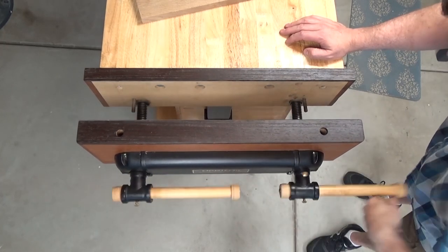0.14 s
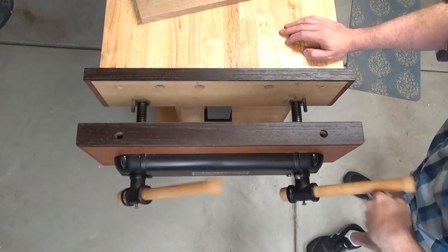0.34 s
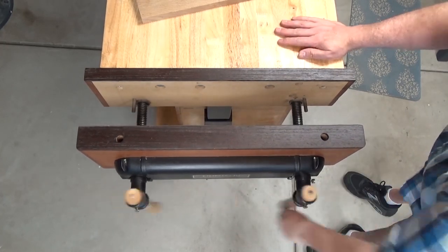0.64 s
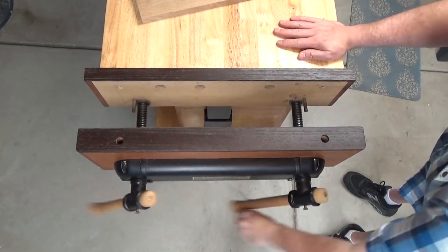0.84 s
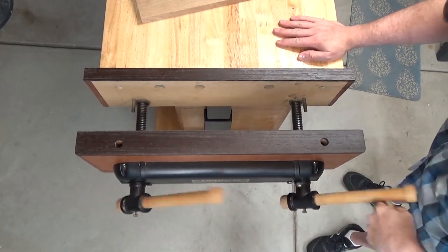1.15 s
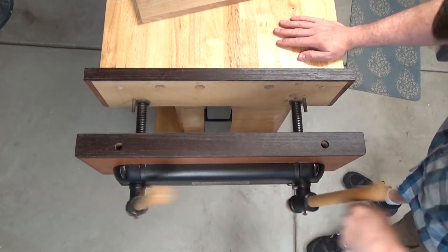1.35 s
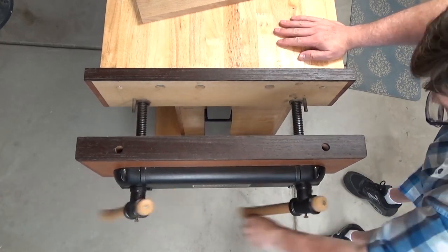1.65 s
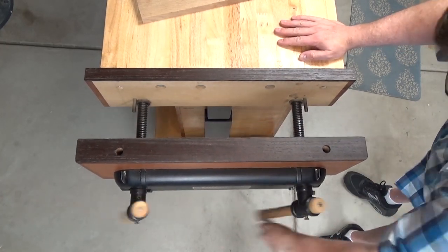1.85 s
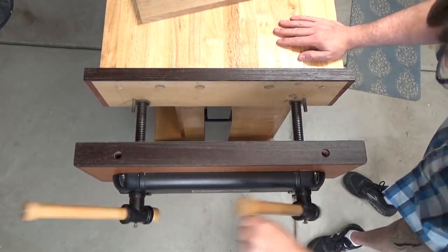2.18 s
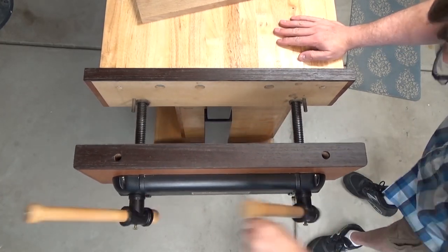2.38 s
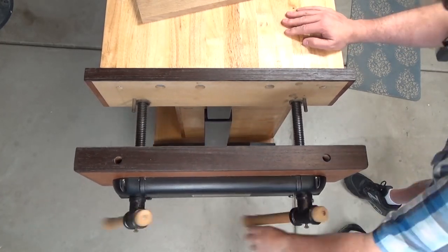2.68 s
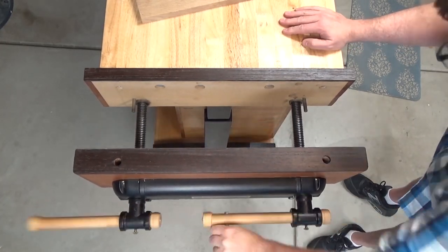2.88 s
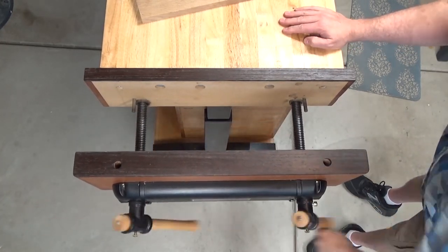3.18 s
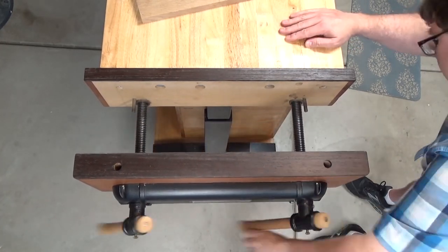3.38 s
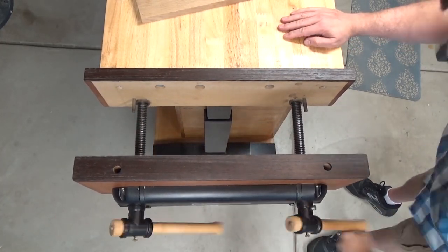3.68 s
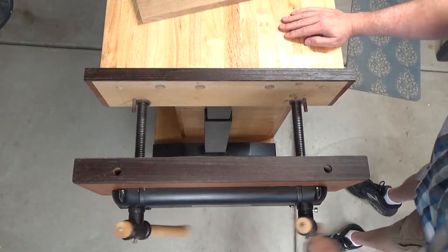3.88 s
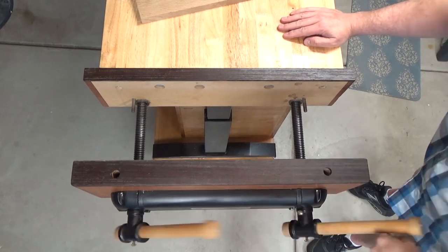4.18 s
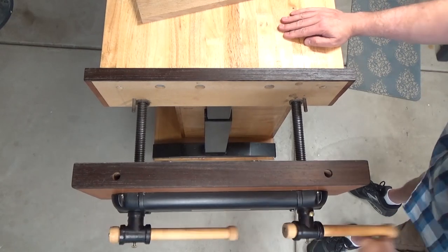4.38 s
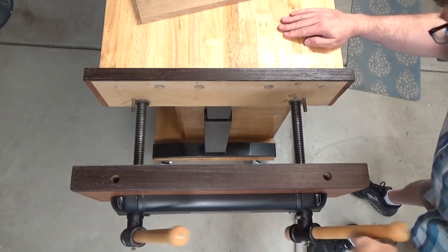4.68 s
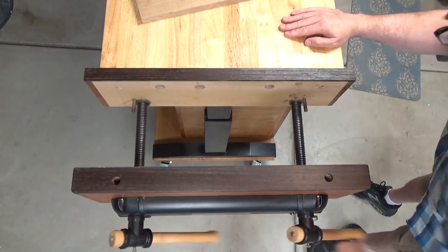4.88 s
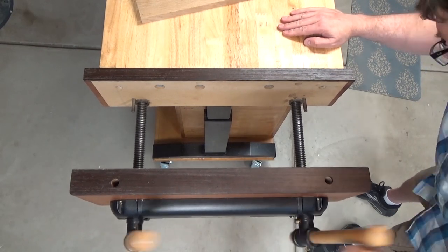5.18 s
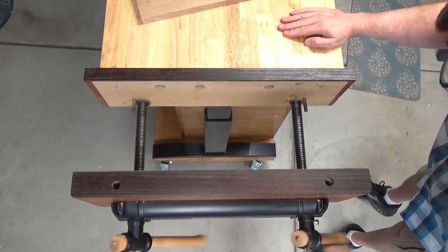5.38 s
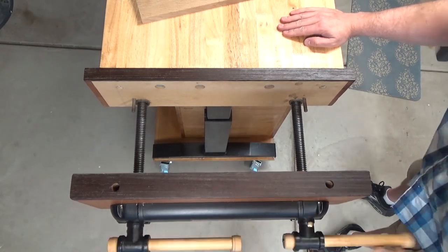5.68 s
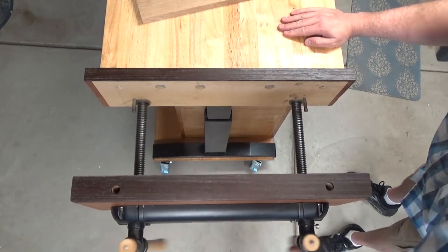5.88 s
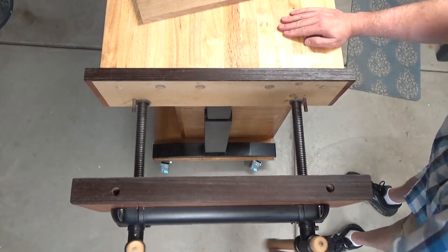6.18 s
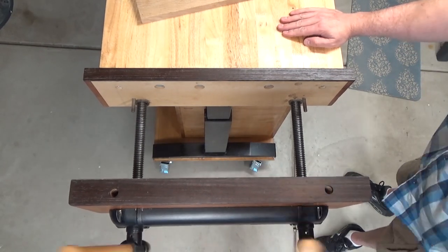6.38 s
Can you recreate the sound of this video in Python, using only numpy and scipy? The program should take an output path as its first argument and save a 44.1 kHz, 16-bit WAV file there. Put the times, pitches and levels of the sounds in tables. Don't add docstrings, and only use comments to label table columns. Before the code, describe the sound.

A heavy bench vise is cranked open in a small workshop. Rough screw threads grind continuously while a chain hisses brightly and ticks over its sprockets. Loose wooden handles knock in iron sockets at irregular intervals, with a hard clack around 2.6 seconds and denser clatter near the end. Close stereo microphones, little bass, short room tail.

```python
import sys
import numpy as np
from scipy import signal
from scipy.fft import rfft, irfft, next_fast_len
from scipy.io import wavfile
from scipy.ndimage import uniform_filter1d, minimum_filter1d

SR = 44100
rng = np.random.default_rng(int(sys.argv[2]) if len(sys.argv) > 2 else 0)


def makeup_ratio(level_db):
    decades = np.asarray(level_db, float) / 20
    return 10 ** decades


def log_audio(samples):
    frames = np.atleast_2d(samples).T
    limited = np.clip(frames, -1, 1)
    pcm = np.round(limited * 32767).astype(np.int16)
    wavfile.write(sys.argv[1], SR, pcm)


N = 288414


def rms_one(x):
    return x / np.sqrt(np.mean(x ** 2) + 1e-20)


def at_hz(points, hz):
    table_hz, values = np.transpose(points)
    return np.interp(np.log(hz), np.log(table_hz), values)


def colour(x, points):
    size = next_fast_len(x.shape[-1])
    hz = np.arange(size // 2 + 1) * SR / size + 1
    inside = (hz > points[0][0]) & (hz < points[-1][0])
    spectrum = rfft(x, size) * makeup_ratio(at_hz(points, hz)) * inside
    return irfft(spectrum, size)[..., :x.shape[-1]]


def filtered(x, order, hz, kind):
    return signal.sosfilt(signal.butter(order, hz, kind, fs=SR, output="sos"), x)


def drift(rate_hz):
    knots_per_s = 200
    knots = rng.standard_normal(int(N / SR * knots_per_s) + 400)
    r = np.exp(-2 * np.pi * rate_hz / knots_per_s)
    slow = signal.lfilter([1], [1, -2 * r, r * r], knots)
    slow = rms_one(slow[300:])
    return np.interp(np.arange(N) * knots_per_s / SR, np.arange(len(slow)), slow)


def ring(clicks, hz, t60):
    r = makeup_ratio(-60 / (t60 * SR))
    w = 2 * np.pi * hz / SR
    return signal.lfilter([0, np.sin(w)], [1, -2 * r * np.cos(w), r * r], clicks + 1e-18)


def dying(clicks, t60):
    return signal.lfilter([1], [1, -makeup_ratio(-60 / (t60 * SR))], clicks + 1e-18)


def grains(per_s, spread_db):
    sizes = makeup_ratio(spread_db * np.minimum(rng.exponential(1, N), 5))
    sizes = sizes * rng.choice([-1, 1], N)
    return rms_one(sizes * (rng.random(N) < per_s / SR))


def strike(times, gains, late_s):
    clicks = np.zeros(N)
    places = ((times + late_s) * SR).astype(int)
    np.add.at(clicks, np.minimum(places, N - 1), gains)
    return clicks


def low_noise(hits):
    floor = makeup_ratio(-88) * rms_one(colour(rng.standard_normal((2, N)), [(10, 0), (170, -2)]))
    return floor * (1 + makeup_ratio(33) * uniform_filter1d(np.abs(hits), size=1500))


# frequency in Hz, t60 in seconds.
SHOP_DECAY = [(300, 0.24), (1000, 0.22), (2500, 0.14), (6000, 0.13), (14000, 0.066)]
# frequency in Hz, side minus mid in dB, before a common lift of
# 8.5 dB.
ECHO_WIDTH = [(200, -31), (600, -30.5), (1000, -39), (1500, -35.5), (2400, -15), (4800, -10), (8500, -6.5),
              (13000, -15.5)]


def shop_echoes(x):
    first_s, paths = 0.0016, 7
    t = np.arange(int(.4 * SR)) / SR
    white = rng.standard_normal((paths, 2, len(t)))
    echo = 0
    for low in 125 * 2.0 ** np.arange(7):
        t60 = at_hz(SHOP_DECAY, low * np.sqrt(2))
        echo = echo + filtered(white, 2, [low, 2 * low], "band") * makeup_ratio(-60 * t / t60)
    echo = echo * np.clip(t / first_s - 1, 0, 1)
    echo = echo / np.sqrt(np.sum(echo[0, 0] ** 2))
    path = np.arange(N) // 1500 % paths
    size = next_fast_len(N + len(t))
    spectrum = sum(rfft(x * (path == k), size) * rfft(echo[k], size) for k in range(paths))
    mid, side = filtered(irfft(spectrum, size)[:, :N], 4, 400, "high")
    return mid, makeup_ratio(8.5) * colour(side, ECHO_WIDTH + [(17000, -19)])


# start in seconds, level in dB.
JAW_JOLTS = [(0.17, -62), (0.73, -61), (0.98, -65), (1.36, -61), (1.85, -67), (2.17, -63), (2.37, -64),
             (2.55, -52.5), (3.49, -60), (3.94, -63), (4.2, -60), (4.46, -58), (4.95, -53), (5.19, -53),
             (5.76, -60), (6.0, -54)]
# frequency in Hz, density in dB per Hz.
RUMBLE_SPECTRUM = [(82, -66), (140, -58), (215, 0), (301, -11.5), (353, -1), (415, -13), (672, -5),
                   (722, -35), (800, 7), (1040, -69), (1760, -120)]


def jaw_rumble(push_db):
    s, db = np.transpose(JAW_JOLTS)
    swell = np.hanning(int(2 * 0.025 * SR))
    decay = dying(strike(s, makeup_ratio(db), 0), 0.26)
    jolts = signal.fftconvolve(decay, 2 * swell / swell.sum())[:N]
    idle = makeup_ratio(push_db - 32.5)
    shake = rms_one(colour(rng.standard_normal(N), RUMBLE_SPECTRUM))
    return (jolts + idle) * makeup_ratio(2.0 * drift(23)) * shake


# start in seconds, length in seconds, frequency in Hz, level in dB.
JAW_GROANS = [
    (5.31, .07, 730, -55),
    (5.47, .06, 600, -60),
    (6.18, .09, 730, -50),
]


def groans():
    t = np.arange(N) / SR
    tones = np.zeros(N)
    for s, length, hz, db in JAW_GROANS:
        swell = np.sin(np.pi * np.clip((t - s) / length, 0, 1))
        tones += makeup_ratio(db) * swell * np.sin(2 * np.pi * hz * t)
    return makeup_ratio(2.5 * drift(25)) * tones


# start in seconds, peak in dB, pin part in dB, low part in dB.
LINK_SNAPS = [(0.8115, -21.5, -20, -21), (0.8567, -17.5, -24, -27), (0.9107, -19, -13, -29),
              (1.4339, -15, -22, 1), (1.6343, -22, -15, -17), (1.672, -13.5, -20, -21),
              (1.712, -15.5, -2, -17), (2.2435, -18.5, -4.5, -5.5), (2.269, -24.5, 1, -5),
              (2.6236, -21, -12, -6), (2.6428, -14, -4, 3), (2.7524, -21, -9, -17), (2.8955, -19, -3, -23),
              (2.9102, -11.5, -28, -34), (2.9944, -15.5, -1, -26), (3.1343, -24, -6, 0),
              (3.3763, -23.5, -15, -12), (3.5476, -19, 1.5, -30), (3.6063, -21, 1, -23),
              (4.066, -16.5, -19, -22), (4.5367, -14, -11, -31), (4.811, -21, -12, -24),
              (4.8875, -16, -2.2, -7), (5.242, -13, -4, -16), (5.378, -19, -3, -19),
              (5.5055, -18, -2.2, -13), (5.612, -15.5, -23, -18), (5.807, -19, -4, -16),
              (6.0722, -11, -7, -9), (6.46, -18.5, -18, -18)]
# start in seconds, peak in dB.
PIN_CLICKS = [(0.0246, -26), (0.142, -23), (0.1883, -28), (0.3197, -27), (0.537, -25), (1.201, -22),
              (2.4009, -24), (2.7302, -29), (3.4745, -26), (3.6346, -25), (4.0143, -24.5), (4.235, -22),
              (4.377, -31), (4.4398, -24.5), (4.6334, -20.5), (5.011, -20), (5.027, -14.5), (5.9887, -22),
              (6.094, -20), (1.813, -24), (1.833, -21), (4.6927, -26), (5.7678, -19), (6.4055, -19)]
# levels in dB of the link, pin and low parts.
PIN_CLICK_PARTS = [-6, 0, -14]
# frequency in Hz, level in dB, t60 in seconds,
# part (its whole number: 0 or -3 link, 1 pin, 2 low).
LINK_MODES = [(5060, -26, 0.0054, 2.3), (5900, -30, 0.005, -3), (6570, 1, 0.00094, 2.9),
              (8300, -21.5, 0.0046, 0), (8900, -6, 0.0027, 0.5), (9100, -13, 0.0042, 0.5),
              (9780, -7.5, 0.0022, 0), (11670, -6.5, 0.0031, 1.3), (12900, -8, 0.0039, 1.1),
              (13900, -5.5, 0.0023, 1.1), (14700, -12, 0.0021, 2.8)]


def ticks():
    snaps = [(s, db, 0, pin_db, low_db) for s, db, pin_db, low_db in LINK_SNAPS]
    pins = [(s, db, *PIN_CLICK_PARTS) for s, db in PIN_CLICKS]
    shaken = [(s, -24 + 1.4 * (db + edge_db + 25.5), 1, -1.5, 5) for s, db, _, edge_db in HANDLE_KNOCKS]
    s, peak_db, *parts = np.transpose(snaps + pins + shaken)
    chance = rng.standard_normal((len(s), len(LINK_MODES), 2))
    buzz = grains(2500, spread_db=4.0)
    out = np.zeros(N)
    for k, (hz, db, t60, part) in enumerate(LINK_MODES):
        gains = makeup_ratio(peak_db + parts[int(part)] + db + 2.0 * chance[:, k, 0])
        snap = strike(s, gains, np.abs(chance[:, k, 1]) * .0005)
        out += ring(snap + buzz * dying(snap, 0.13) * makeup_ratio(-25.0), hz, t60)
    return out


# start in seconds, peak in dB, weight of the wood in dB, iron edge in dB.
HANDLE_KNOCKS = [(0.2057, -27.5, 10.5, -21), (0.7459, -26.5, 3, -15), (1.073, -15, -11, -14.5),
                 (1.3695, -7, -1, -25), (1.872, -21.5, -5.5, -11), (2.1835, -5, -10, -20.5),
                 (2.5807, 2.5, -12, -23.5), (2.7793, -10.5, -14.5, -23), (3.514, -9.5, -14, -25),
                 (3.6592, -11.5, -26, -11), (3.931, -7.5, -24, -24.5), (4.1529, -10, -24, -16),
                 (4.24, -24.5, -3.5, -6.5), (4.4756, -16.5, -14, -27), (4.8497, -10.5, -20, -12),
                 (4.9134, -5, -20.5, -18), (4.9813, -7.5, -21, -19), (5.0158, -21.5, -2, -19),
                 (5.1288, -6.5, -17.5, -17.5), (5.2018, -1.5, -13, -17), (5.396, -9, -25, -22),
                 (5.6322, -13, -28, -27), (5.672, -15.5, -22, -26), (5.7655, -15.5, -4.5, -15.5),
                 (5.859, -11.5, -30, -10), (5.9348, -10.5, -16, -18.5), (5.9952, -18, -2.5, -23),
                 (6.0315, -4.5, -10, -24), (6.2299, -14, -21.5, -21), (6.407, -29, -2.5, -8)]
# start in seconds, peak in dB, weight of the wood in dB.
HANDLE_TAPS = [(0.261, -22.5, -30), (0.4244, -25, -11), (1.22, -26, -24), (1.276, -31, -8), (2.374, -36, 8),
               (2.3975, -33.5, 6), (2.5474, -34, 5), (2.8759, -35, -14), (2.9572, -33, -13),
               (4.0166, -28, -0.5), (4.046, -29.5, -3), (5.0482, -26, -26)]
KNOCK_CENTRES = [1200, 1750, 2350, 3400, 5600]
# frequency in Hz, level in dB, t60 in seconds.
HANDLE_MODES = [(725, -17, 0.073), (856, -25, 0.023), (1154, -10.5, 0.09), (1268, -6.5, 0.01),
                (1348, -6.5, 0.05), (1574, -11.5, 0.008), (1661, -11.5, 0.15), (1736, -7, 0.15),
                (1831, -5.5, 0.035), (2043, -14.5, 0.02), (2150, -15.5, 0.18), (2353, -6.5, 0.11),
                (2503, -11.5, 0.051), (2736, -8, 0.01), (2933, -1.5, 0.0077), (3146, -3.5, 0.0047),
                (3504, 1.5, 0.016), (3464, -2.5, 0.037), (4080, -6.5, 0.014), (4570, 0, 0.0064),
                (4980, 0, 0.034), (5640, -1, 0.03), (5980, -0.5, 0.014), (7200, -3, 0.0034),
                (8040, -4, .005), (9700, -10, .004)]


def knocks():
    tap_edge_db = -11.5
    s, peak_db, low_db, edge_db = np.transpose(HANDLE_KNOCKS + [(*tap, tap_edge_db) for tap in HANDLE_TAPS])
    body_db = -2 + 0.25 * low_db
    upper_db = -6 + 0.3 * low_db
    rattle_db = -19 - 0.24 * peak_db - 0.19 * low_db
    part_levels = [(low, body, -4, upper, edge + 2.5)
                   for low, body, upper, edge in zip(low_db, body_db, upper_db, edge_db)]
    chance = rng.standard_normal((len(s), len(HANDLE_MODES), 2))
    crunch = rng.standard_normal(N)
    chatter = grains(1500, spread_db=1.0)
    out = np.zeros(N)
    for k, (hz, db, t60) in enumerate(HANDLE_MODES):
        parts_db = [np.interp(hz, KNOCK_CENTRES, levels) for levels in part_levels]
        late_s = (1.1 + .45 * chance[:, k, 1]) * 4.0 / hz - .0008
        gains = makeup_ratio(peak_db + parts_db + db + 1.5 * chance[:, k, 0])
        blow = strike(s, gains, late_s)
        rattle = chatter * dying(strike(s, gains * makeup_ratio(rattle_db), 0.0017), 0.19)
        crushing = crunch * dying(blow, 0.025)
        contact = blow * makeup_ratio(-2.5) + crushing * makeup_ratio(-11) + rattle * makeup_ratio(.3)
        damped = ring(contact, hz, 11.0 / hz)
        free = ring(blow + rattle * makeup_ratio(-18), hz, min(t60, .045)) * makeup_ratio(-16)
        out += (damped + free) * (-1) ** k
    return out


# frequency in Hz, density in dB per Hz.
HISS_SPECTRUM = [(3530, -7), (6000, -1), (8070, -2.5), (9120, 1), (11200, -4.5), (14800, -5), (15600, -0.5),
                 (16100, -18), (16300, -17), (16500, -39)]


def chain(level_db):
    slide = grains(9000, spread_db=2.5) * makeup_ratio(1.5 * drift(10))
    links = ring(grains(70, spread_db=1.8), 9000, .003)
    pins = ring(grains(110, spread_db=2.2) * makeup_ratio(2.5 * drift(5)), 14000, .002)
    mixed = slide + makeup_ratio(-12.5) * rms_one(links) + makeup_ratio(-4.0) * rms_one(pins)
    return makeup_ratio(level_db) * rms_one(colour(mixed, HISS_SPECTRUM))


# frequency in Hz, density in dB per Hz.
GRIND_SPECTRUM = [(290, -88), (500, -20), (725, -19), (883, -14.5), (1130, 0.5), (1600, -7), (2950, 1),
                  (3630, -4.5), (4690, -2), (5330, -8), (8000, -25.5), (10400, -39), (17600, -120)]
# frequency in Hz, width in Hz, level in dB.
JAW_RESONANCES = [(746, 150, -6.5), (1070, 34, -5), (1795, 13, 4), (1965, 17, 5.5), (2510, 480, 4),
                  (2906, 27, 3), (4020, 21, 3.5), (4610, 38, 1.5), (6200, 34, -29.5)]


def threads(level_db):
    rub = grains(5000, spread_db=3.0) * makeup_ratio(1.4 * drift(30))
    hum = np.zeros(N)
    for k, (hz, width, db) in enumerate(JAW_RESONANCES):
        hum += makeup_ratio(db) * np.sqrt(width) * ring(rub, hz, 2.2 / width) * (-1) ** k
    board = ring(ring(rub, 1159, 0.034), 1159, 0.034)
    broad = rms_one(colour(rub, GRIND_SPECTRUM))
    return makeup_ratio(level_db) * rms_one(broad + makeup_ratio(-10.0) * rms_one(hum) + makeup_ratio(-10) * rms_one(board))


# time in seconds, push on the threads in dB, chain speed level in dB.
CRANKING = [(0.0, -33.5, -40), (0.51, -35, -38), (0.64, -30.5, -33.5), (0.78, -35.5, -37.5),
            (1.02, -36.5, -38.5), (1.4, -33, -38.5), (2.02, -35, -41.5), (2.46, -34, -40),
            (2.66, -38.5, -41), (3.25, -37.5, -45.5), (3.62, -37.5, -40), (4.68, -38, -42),
            (4.85, -44.5, -42.5), (5.17, -30.5, -36), (5.34, -40, -46), (5.8, -38, -41),
            (6.06, -33.5, -42.5), (6.25, -43, -49)]
# time in seconds, change in dB.
SCREW_SURGES = [(0.16, 2), (0.29, 2.5), (0.41, -1.5), (0.83, -2.5), (1.15, -4), (1.5, 1.5), (1.63, -3),
                (1.85, 2.5), (2.5, -2), (2.72, -2.5), (3.31, -2.5), (4.37, -3), (4.64, 4), (4.76, -3.5),
                (5.35, -3.5), (5.48, -2.5), (5.73, -4), (6.34, -2.5), (6.43, 3)]


def cranking():
    t = np.arange(N) / SR
    s, push_db, speed_db = np.transpose(CRANKING)
    surge_db = sum(db * np.exp(-.5 * ((t - at) / 0.03) ** 2) for at, db in SCREW_SURGES)
    chain_share = 0.81
    return np.interp(t, s, push_db) + surge_db, np.interp(t, s, speed_db) + chain_share * surge_db


def scene():
    grind_db, hiss_db = cranking()
    steady = makeup_ratio(-3) * filtered(threads(grind_db) + chain(hiss_db), 4, 250, "high")
    blows = knocks() + ticks()
    hits = filtered(blows, 6, 930, "high") + makeup_ratio(-28) * filtered(blows, 2, [350, 800], "band")
    rumble = jaw_rumble(grind_db)
    floor = low_noise(hits)
    echo_mid, echo_side = shop_echoes(makeup_ratio(-9.5) * hits + makeup_ratio(-7.5) * steady)
    mid = echo_mid + steady + hits + rumble + groans() + floor[0]
    bench = filtered(np.roll(hits, 90), 2, [900, 2600], "band")
    side = echo_side + makeup_ratio(-11) * floor[1] + makeup_ratio(-35) * np.roll(rumble, 400) + makeup_ratio(-19.5) * bench
    return np.array([mid + side, mid - side])


def roll_off(x):
    return signal.sosfilt(signal.butter(12, 16970, fs=SR, output="sos"), x)


def record(dry):
    need = np.minimum(1, .93 / (np.abs(dry).max(axis=0) + 1e-9))
    gain = uniform_filter1d(minimum_filter1d(need, size=129), size=129)
    low_pass = signal.cheby2(16, 30, 15900, fs=SR, output="sos")
    return roll_off(signal.sosfilt(low_pass, dry * gain))


dry = scene()
out = record(dry)
log_audio(out)
```